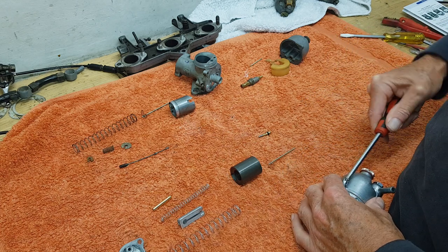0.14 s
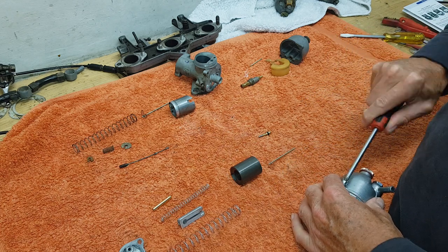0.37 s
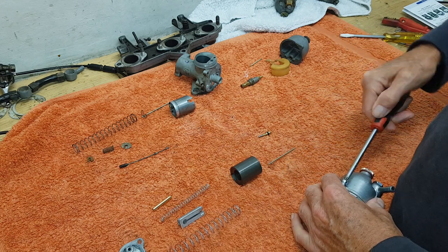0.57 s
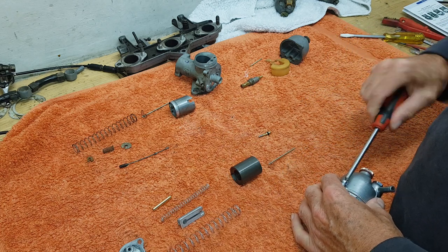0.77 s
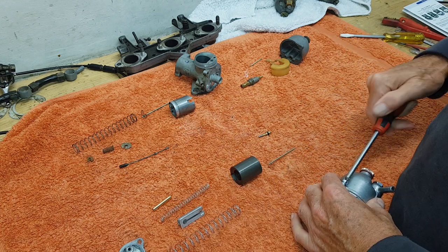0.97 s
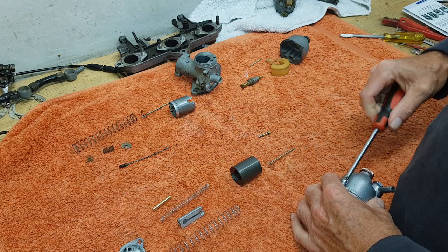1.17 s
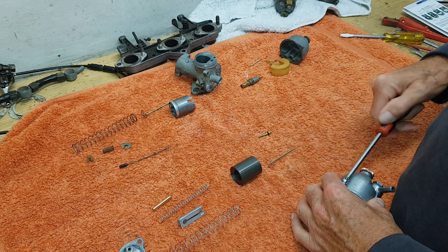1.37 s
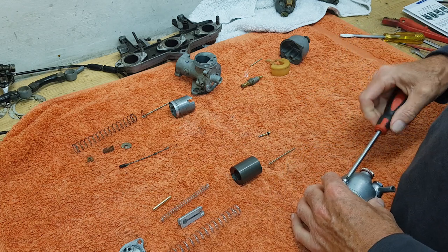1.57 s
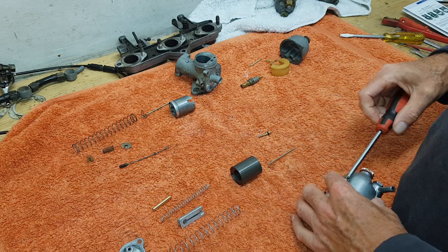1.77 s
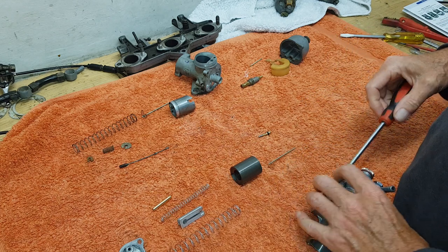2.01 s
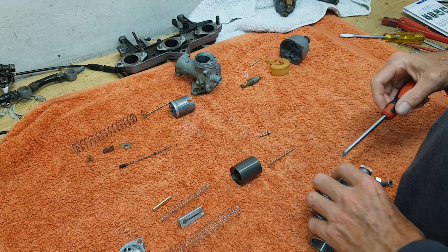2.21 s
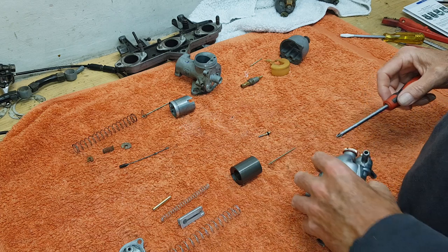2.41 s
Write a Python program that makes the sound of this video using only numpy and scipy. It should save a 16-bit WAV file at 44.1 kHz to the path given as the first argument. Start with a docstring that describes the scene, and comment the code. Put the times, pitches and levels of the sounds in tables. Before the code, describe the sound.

Close up in a small workshop, a screwdriver blade slips against a carburettor screw with light metallic clicks. Short scrapes of twisting and handling follow, then a last scraping click and soft bumps on the workbench, over faint hiss.

```python
"""A small workshop: a screwdriver works the small screws of a carburettor held on a towel-covered bench.
Impacts of the blade in the slot excite the free vibration of the metal, and sliding friction of screw
and hand makes grainy noise. The casting thuds on the bench, whose low modes boom, and the bench rumbles
under the hands. A close stereo microphone takes in direct sound and brief reverberation, and adds hiss."""
import sys
import numpy as np
from scipy import signal
from scipy.fft import rfft, irfft
from scipy.io import wavfile
from scipy.ndimage import uniform_filter1d

SR = 44100
rng = np.random.default_rng(int(sys.argv[2]) if len(sys.argv) > 2 else 0)


def master_out(mix):
    """Clip the mix to full scale and print it as 16-bit PCM to the path in sys.argv[1]."""
    frames = np.transpose(np.atleast_2d(mix))
    ceiling = np.clip(frames, -1, 1)
    pcm = np.round(ceiling * 32767).astype(np.int16)
    wavfile.write(sys.argv[1], SR, pcm)


N = 108045
T = np.arange(N) / SR

# Blade impacts: t/s, chatter decay/s, relative level/dB at each of CLICK_BANDS, relative ring level/dB
BLADE_CLICKS = [(0.2421, 0.0011, 1.5, -14, 0.5, -1.5, -2.5, 4),
                (0.2444, 0.0003, 2.5, -11, 1.5, -21, -23, -0.5),
                (0.2478, 0.0014, 7, -12.5, -8, -33, -31, 8), (.5086, 0.002, -9, 8, 0, -7.5, -6.5, -5),
                (0.5123, 0.016, 10.5, 3.5, -7, -13.5, -36, 2),
                (0.7809, 0.00083, -5.5, -15, -7, -12.5, -16, -14),
                (0.7851, 0.0045, 2, -5, -10.5, -21, -60, -21),
                (0.799, 0.008, -4, -8.5, -10, -23.5, -27, -18),
                (1.945, 0.028, 3, -15.5, -27, -31, -20.5, -14), (1.957, 0.037, 3, -4.5, -33, -39, -45, 3)]
# Points of the impact spectrum: f/Hz
CLICK_BANDS = [350, 1200, 3300, 5000, 9500]
# Modes of blade and casting: f/Hz, relative level/dB, T60/s
METAL_MODES = [(2790, -1, 0.14), (2970, -2, 0.2), (3300, -6, 0.1), (3740, -3, 0.11), (4000, -11, 0.24),
               (4620, -21, 0.39), (4940, -10, 0.16), (6900, -4, 0.089)]


def blade_clicks(snap=0.66, metal_db=-40):
    """Impact excitation: each slip is an impulse plus contact chatter, which sets the metal ringing."""
    knocks, rings = np.zeros(N), np.zeros(N)
    for start, decay, low, mid, high, bright, top, ring_db in BLADE_CLICKS:
        force = chatter(decay)
        force[0] += snap
        bands = zip(CLICK_BANDS, (low, mid, high, bright, top))
        spectrum = [(100, low - 7.5), *bands, (2050, (mid + high) / 2 - 4), (15000, top - 5)]
        knock = colour(whiten(force), sorted(spectrum))
        add(knocks, knock, start)
        metal = modal_ring(METAL_MODES, blur_hz=170)
        add(rings, undb(metal_db + ring_db) * signal.fftconvolve(knock, metal), start)
    return knocks, rings


# Modes of the screw: f/Hz, relative level/dB, T60/s
SCREW_MODES = [(4250, -3, 0.054), (5620, -0.5, 0.056), (8900, 2, .05), (9180, 4, .06)]


def lift_tick():
    """Free vibration: the screw rings faintly as the blade lifts off."""
    force = whiten(chatter(decay_s=0.0028))
    return undb(-57) * signal.fftconvolve(force, modal_ring(SCREW_MODES, blur_hz=220))


# Rubs of screw and hand: peak t/s, rise/s, fall/s, relative level/dB at each of RUB_BANDS
FRICTION_STROKES = [(.14, 0.0087, 0.026, -39.5, -60, -94, -92), (.27, .012, 0.037, -17.5, -40.5, -103, -81),
                    (0.399, 0.033, 0.026, -37, -61, -60.5, -56), (0.479, 0.006, 0.059, -49, -84, -57, -59),
                    (0.67, 0.0098, 0.037, -31.5, -52.5, -65.5, -76),
                    (.775, 0.02, 0.014, -40, -34.5, -53.5, -71),
                    (0.941, 0.025, 0.018, -34.5, -71, -76, -59.5),
                    (1.128, 0.0078, 0.019, -25.5, -41, -58.5, -70),
                    (1.15, 0.011, 0.036, -34.5, -35.5, -54, -47),
                    (1.17, 0.017, 0.037, -26.5, -36.5, -50.5, -63),
                    (1.241, 0.021, 0.009, -30.5, -50.5, -61, -57.5),
                    (1.316, .008, 0.0071, -35, -47, -59.5, -50.5),
                    (1.447, 0.0061, 0.042, -21, -48, -62.5, -67),
                    (1.526, 0.014, 0.01, -21.5, -43, -56.5, -57.5),
                    (1.81, 0.031, 0.047, -42, -79, -74, -56), (1.898, 0.027, 0.18, -40.5, -85, -66, -66),
                    (2.032, 0.018, 0.028, -39, -44, -82, -79)]
# Points of the friction spectrum: f/Hz
RUB_BANDS = [350, 1000, 4000, 11000]


def rubs(grain_db=4, grain_s=0.0018):
    """Sliding friction: grainy noise swells and dies with each twist or change of grip."""
    out, t = np.zeros(N), T[:SR // 2]
    for peak, rise, fall, low, mid, high, top in FRICTION_STROKES:
        roughness = np.interp(t / grain_s, np.arange(len(t)), rng.standard_normal(len(t)))
        friction = unit(undb(grain_db * roughness) * rng.standard_normal(len(t)))
        lead = min(6 * rise, peak)
        cusp = np.exp(np.minimum((t - lead) / rise, (lead - t) / fall))
        swell = uniform_filter1d(cusp, size=SR // 55)
        bands = zip(RUB_BANDS, (low, mid, high, top))
        spectrum = [(120, low - 7), *bands, (1200, mid - 3), (1560, high - 2)]
        add(out, colour(friction * swell, sorted(spectrum)), peak - lead)
    return out


# Seats of the blade in the slot: start t/s, then f/Hz, level/dB for each of three resonances
BLADE_SEATS = [(.2, 223, -7.5, 3310, -4, 5060, 4.5), (.49, 1570, -5.5, 3300, 4, 5100, 1),
               (0.759, 664, 6.5, 2650, 0.5, 6320, 3.5), (1.08, 1097, 7, 2470, -2, 4000, 6),
               (1.291, 425, -4.5, 2366, 5, 6400, -9), (1.931, 1290, 0.5, 3930, 10.5, 5240, 7)]


def slot_resonances(contact, q=11):
    """Contact resonance: each new seat of the blade brings out three frequencies of its own."""
    out = np.zeros(N)
    seat = np.searchsorted([row[0] for row in BLADE_SEATS], T) - 1
    for k, (_, *peaks) in enumerate(BLADE_SEATS):
        for hz, db in zip(peaks[::2], peaks[1::2]):
            out += undb(db) * resonate(contact * (seat == k), hz, q)
    return out


# Hollow resonances of casting and bench top: f/Hz, bandwidth/Hz, relative level/dB
BODY_RESONANCES = [(193, 12, 0), (281.2, 20, 1.5), (354.9, 7.4, -1.5), (435, 46, 3.5), (630, 61, -5.5),
                   (1224, 74, -6.5), (1405, 42, -5.5), (2680, 130, -2)]


def casting_body(contact):
    """Forced vibration: casting and bench top add their hollow resonances to the contact sound."""
    hollow = sum(undb(db) * resonate(contact, hz, hz / width) for hz, width, db in BODY_RESONANCES)
    return contact + undb(2) * hollow


# Soft thuds of the casting: t/s, contact duration/s, relative level/dB
CASTING_THUDS = [(.254, 0.0067, -25), (.271, 0.0022, -27.5), (0.292, 0.0075, -29), (.39, 0.0065, -37),
                 (.507, 0.0093, -30.5), (0.637, 0.0089, -37), (0.81, 0.036, -49), (1.88, 0.0033, -47.5),
                 (1.907, 0.0059, -40), (2.157, 0.02, -34.5)]
# Modes of the bench: f/Hz, relative level/dB, T60/s
BENCH_MODES = [(60.2, 4.5, 0.11), (103.5, 8, 0.14), (192.2, 2, 0.12)]


def bench_thuds():
    """Cushioned impact: a half-sine force drives the bench modes; longer contact gives a duller thud."""
    out = np.zeros(N)
    for start, duration, db in CASTING_THUDS:
        force = np.sin(np.pi * np.minimum(T[:SR // 20] / duration, 1))
        add(out, undb(db) * signal.fftconvolve(force / force.sum(), modal_ring(BENCH_MODES)), start)
    return out


# Spectrum of the bench rumble: f/Hz, relative level/dB
RUMBLE_SPECTRUM = [(22, -30), (32, -34), (42, 4), (53, 5), (68, 3), (85, -10.5), (108, -6), (145, -26.5),
                   (220, -39)]
# Envelope of the rumble: t/s, level/dB
RUMBLE_ENVELOPE = [(0, -46), (.18, -42), (.4, -43), (.48, -48), (.6, -46), (.9, -43), (1.05, -47),
                   (1.15, -43), (1.5, -44), (1.66, -54), (1.76, -44), (1.94, -42), (2.07, -45), (2.18, -38),
                   (2.25, -46), (2.45, -47)]


def bench_rumble(side_db=-13):
    """Structure-borne noise: the working hands drive the bench at random, mostly in the deep bass."""
    spectrum = [(10, -45), *RUMBLE_SPECTRUM, (500, -70), (2000, -110)]
    mid, side = (unit(colour(rng.standard_normal(N), spectrum, size=16384)) for _ in range(2))
    steady_mid = mid / np.sqrt(uniform_filter1d(mid ** 2, size=SR // 12))
    envelope = undb(np.interp(T, *np.array(RUMBLE_ENVELOPE).T))
    return envelope * (steady_mid + undb(side_db) * np.array([side, -side]))


# Reverberation of the workshop by band: f/Hz, T60/s, relative level/dB
ROOM_BANDS = [(163, 0.45, 3.5), (480, 0.28, -3.5), (1450, 0.28, -3.5), (3570, 0.3, -9), (8000, 0.22, 7),
              (14300, 0.2, -10)]


def workshop(x, direct_db=-4.5, early_db=6.5, early_decay_s=0.0051, left_lag_s=0.000136):
    """Reverberation: direct sound, early scatter from bench and wall, then a short exponential tail."""
    t = T[:SR // 2]
    log_hz = np.log(np.arange(len(t) // 2 + 1) * SR / len(t) + 1)
    field = rfft(diffuse(*rng.standard_normal((2, len(t)))))
    centres = np.log([row[0] for row in ROOM_BANDS])
    onset = 1 - np.exp(-(t / 0.00097) ** 2)
    early = onset * np.exp(-t / early_decay_s)
    early *= undb(early_db) / np.linalg.norm(early)
    response = np.zeros((2, len(t)))
    for share, (_, t60, db) in zip(np.eye(len(ROOM_BANDS)), ROOM_BANDS):
        band = irfft(field * np.interp(log_hz, centres, share), len(t))
        tail = onset * np.exp(-np.log(1000) * t / t60)
        response += undb(db) * np.hypot(tail / np.linalg.norm(tail), early) * band
    response[0, round(left_lag_s * SR)] += undb(direct_db)
    response[1, 0] += undb(direct_db)
    return np.array([signal.fftconvolve(x, whiten(channel))[:N] for channel in response])


# Spectral density of the hiss: f/Hz, relative level/dB
HISS_SPECTRUM = [(200, 7), (500, -3), (1000, -6), (2200, -8.5), (4800, -12.5), (6800, -17.5), (8300, -15.5),
                 (10000, -7), (12500, -1), (15800, -2.5)]


def hiss():
    """Noise floor: quiet room air and the microphone's bright self-noise."""
    noises = [unit(colour(rng.standard_normal(N), [(60, -20), *HISS_SPECTRUM])) for _ in range(2)]
    return undb(-58) * diffuse(*noises) * pan(0.2)


def chatter(decay_s):
    """Random micro-impacts: an exponentially dying noise burst of unit energy."""
    force = rng.standard_normal(SR // 8) * np.exp(-T[:SR // 8] / decay_s)
    return force / np.linalg.norm(force)


def modal_ring(modes, blur_hz=0):
    """Modal superposition: damped sines; loose parts in contact blur each line by phase diffusion."""
    t = T[:SR // 2]
    steps = rng.standard_normal((len(modes), len(t)))
    drifts = np.cumsum(steps, axis=1) * np.sqrt(2 * np.pi * blur_hz / SR)
    return sum(undb(db) * np.sin(2 * np.pi * hz * t + drift) * np.exp(-np.log(1000) * t / t60)
               for (hz, db, t60), drift in zip(modes, drifts))


def resonate(x, hz, q):
    """Second-order resonance with unit gain at its peak."""
    return signal.lfilter(*signal.iirpeak(hz, q, fs=SR), x)


def diffuse(a, b, corner_hz=535):
    """Diffuse-field coherence: two noises become a pair alike in the bass, unrelated in the treble."""
    hz = np.arange(len(a) // 2 + 1) * SR / len(a)
    coherence = 0.88 / (1 + (hz / corner_hz) ** 2)
    mid = irfft(rfft(a) * np.sqrt((1 + coherence) / 2), len(a))
    side = irfft(rfft(b) * np.sqrt((1 - coherence) / 2), len(a))
    return np.array([mid + side, mid - side])


def colour(x, points, size=2048):
    """Minimum-phase filtering through (f/Hz, level/dB) points, by folding the cepstrum."""
    hz, db = np.array(points, float).T
    log_hz = np.log(np.arange(size // 2 + 1) * SR / size + 1)
    gain = undb(np.interp(log_hz, np.log(hz), db))
    cepstrum = irfft(np.log(gain))
    cepstrum[1:size // 2] *= 2
    cepstrum[size // 2 + 1:] = 0
    return signal.fftconvolve(x, irfft(np.exp(rfft(cepstrum))))[:len(x)]


def whiten(x, smooth_hz=125):
    """Inverse filtering: a burst gets a level spectrum and unit energy but keeps its fine scatter."""
    hz = np.arange(1, 800) * 25
    power = uniform_filter1d(np.abs(rfft(x, SR)) ** 2, smooth_hz)[hz]  # bins are 1 Hz apart
    return colour(x, np.column_stack([hz, -10 * np.log10(power)]))


def pan(left_db):
    """Level panning: stereo gains with the left channel left_db above the right."""
    return undb(np.array([[left_db], [-left_db]]) / 2)


def add(out, x, start):
    """Superposition of x on out from start/s."""
    i = int(start * SR)
    out[i:i + len(x)] += x[:N - i]


def undb(db):
    """Amplitude ratio of a level/dB."""
    return 10 ** (np.asarray(db) / 20)


def unit(x):
    """Normalisation to rms 1."""
    return x / np.sqrt(np.mean(x ** 2))


def scene():
    """Source and filter: clicks and rubs pass through casting and room, over bench sounds and hiss."""
    knocks, rings = blade_clicks()
    add(rings, lift_tick(), start=2.362)
    contact = knocks + rubs()
    radiated = casting_body(contact) + slot_resonances(contact) + rings
    work = workshop(radiated) + bench_rumble() + bench_thuds()
    return work * pan(1.7) + hiss()


def record(dry, low_cut_hz=31, top_hz=15800):
    """Band limiting: a gentle high-pass thins the deepest bass and a steep low-pass cuts the top."""
    thinned = signal.sosfilt(signal.butter(2, low_cut_hz, "high", fs=SR, output="sos"), dry)
    return signal.sosfilt(signal.ellip(10, .2, 80, top_hz, fs=SR, output="sos"), thinned)


dry = scene()
out = record(dry)
master_out(out)
```